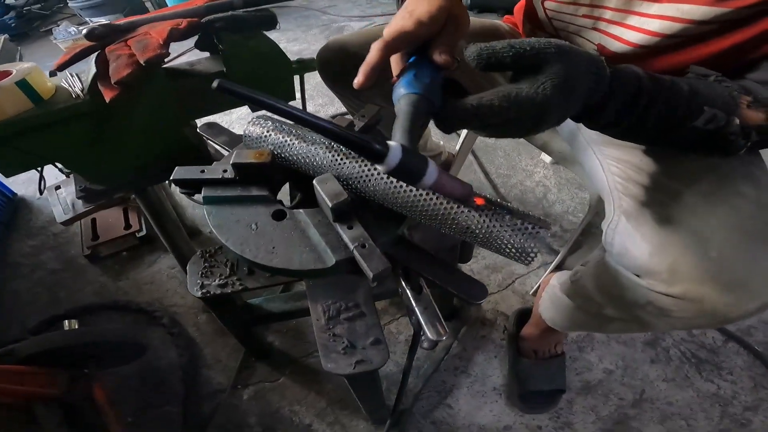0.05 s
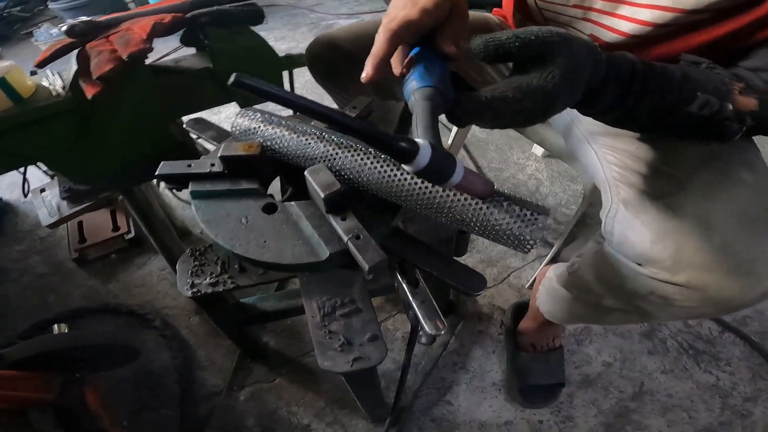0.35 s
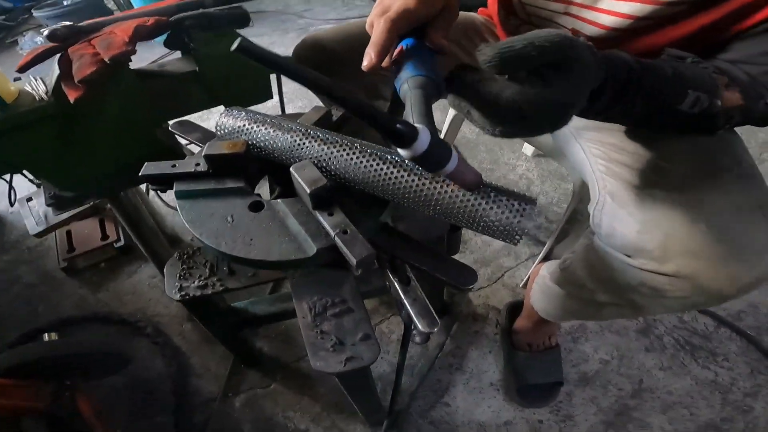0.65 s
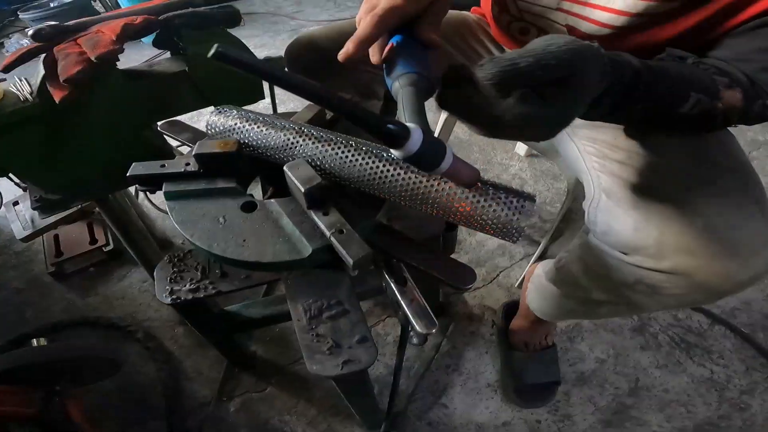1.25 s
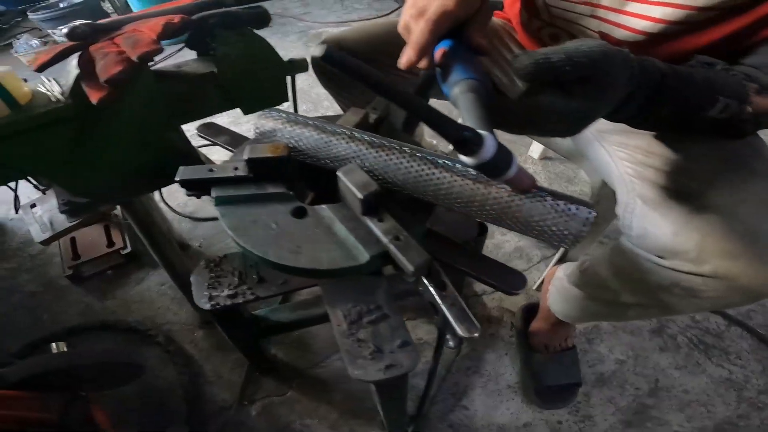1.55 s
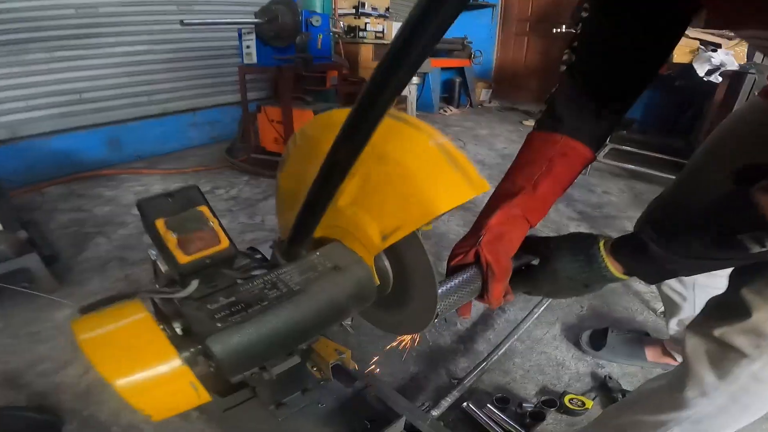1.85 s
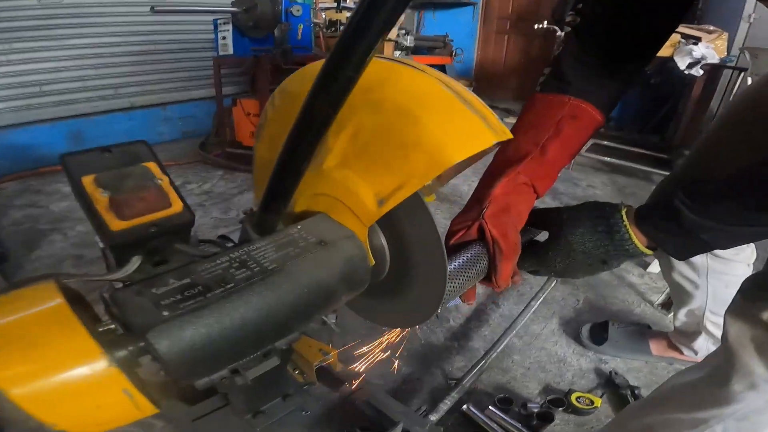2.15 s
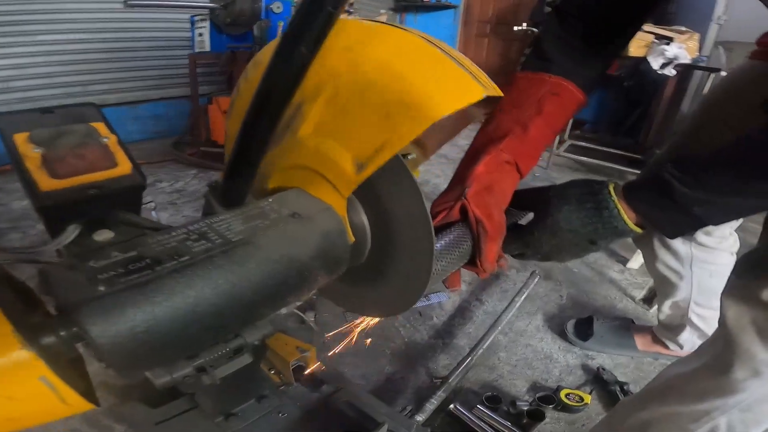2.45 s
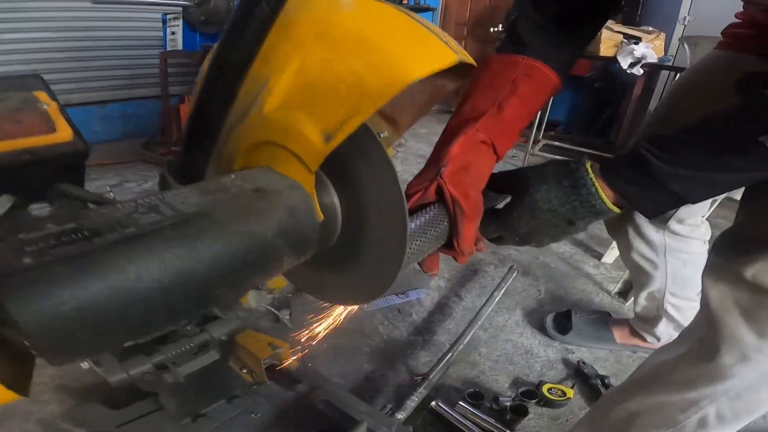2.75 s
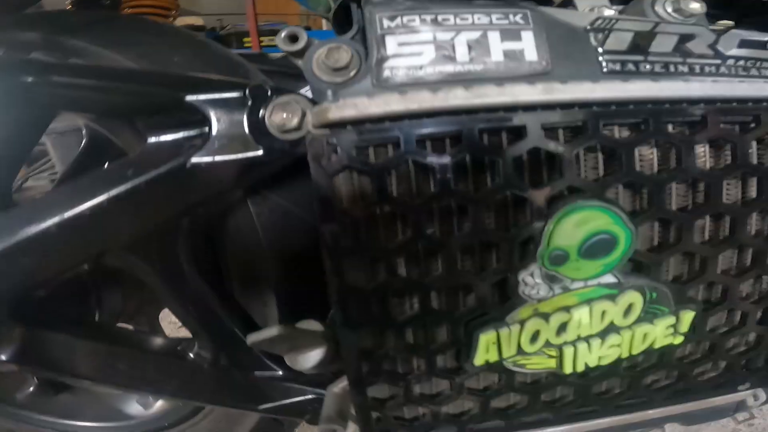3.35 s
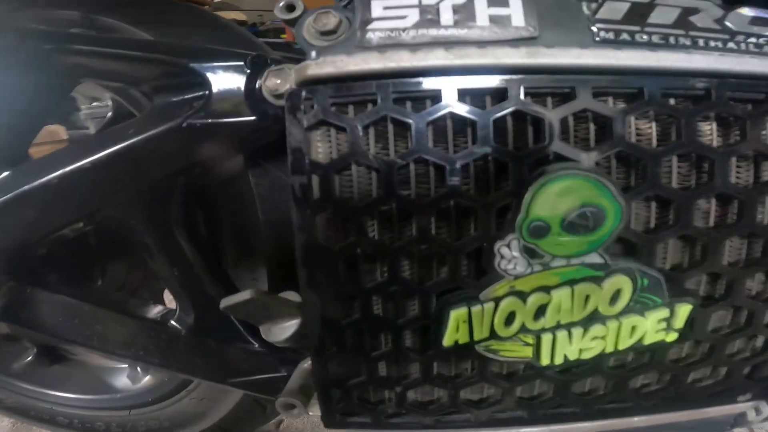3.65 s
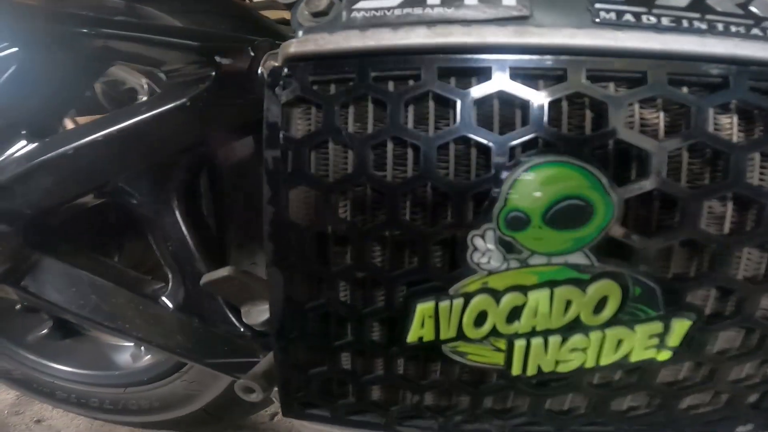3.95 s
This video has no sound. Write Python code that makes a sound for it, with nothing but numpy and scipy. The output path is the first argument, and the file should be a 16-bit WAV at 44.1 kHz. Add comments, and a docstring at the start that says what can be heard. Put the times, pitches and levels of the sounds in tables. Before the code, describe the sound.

A loud chop saw cutting steel tube is the main sound. First a fan roars; a welding arc pops at 1 second, snaps sharply twice, briefly ducking the fan, and hisses at 1.7. At 1.8 the saw starts abruptly, a fast-pulsing, ringing grind whose screech grows shriller, then ragged. It stops at 3.4 with a knock, leaving a quiet machine hum and a light scrape near 3.8.

```python
"""A metal workshop, in three scenes that follow abruptly. Over the roar of a fan a welding arc spits
and snaps, and each snap makes an automatic gain control duck the level. Then an abrasive chop saw
bites into a steel tube once per turn of its wheel: the tube resonates, and stick-slip at the cut
edge screeches ever more shrilly, tearing raggedly at the end. Last, a machine hums in a quieter
room. Short knocks and scrapes sound now and then, and the arc first strikes with a low pop."""
import sys
import numpy as np
from scipy import signal
from scipy.fft import rfft, irfft
from scipy.io import wavfile
from scipy.ndimage import uniform_filter1d, minimum_filter1d, map_coordinates

SR = 44100
rng = np.random.default_rng(int(sys.argv[2]) if len(sys.argv) > 2 else 0)


def digitize_waveform(pressure):
    """Quantize a signal to 16-bit integers and store it at the path in sys.argv[1].

    Rows of a 2-D input are taken as channels; values are limited to [-1, 1].
    """
    field = np.atleast_2d(pressure).T
    bounded = np.clip(field, -1, 1)
    quanta = np.round(bounded * 32767).astype(np.int16)
    wavfile.write(sys.argv[1], SR, quanta)


N = 176400
T = np.arange(N) / SR
HZ = np.fft.rfftfreq(N, 1 / SR)
SAW_START_S, SAW_END_S = 1.819, 3.370
# spectrum of an electric discharge: f/Hz, relative level/dB
ARC_SPECTRUM = [(60, -13), (200, 6.5), (1300, -3), (3000, -1), (5500, -8), (7000, -16), (8500, -37),
                (11000, -35), (15500, -73)]


def amp(db):
    """Amplitude ratio of a level in decibels."""
    return 10 ** (np.asarray(db) / 20)


def unit_rms(x):
    """Normalisation to rms 1."""
    return x / np.sqrt(np.mean(x ** 2) + 1e-20)


def curves(table):
    """Linear interpolation of each column of a time table, at every sample."""
    times, *columns = np.transpose(table)
    return [np.interp(T, times, column) for column in columns]


def at_frequency(table, hz):
    """Interpolation of a table on a logarithmic frequency axis."""
    f, value = np.transpose(table)
    return np.interp(np.log(hz + 1), np.log(f + 1), value)


def filtered(x, response):
    """Linear filtering: the spectrum is multiplied by a frequency response."""
    return irfft(rfft(x) * response, N)


def coloured(x, spectrum):
    """Spectral shaping by a table of levels, at rms 1."""
    return unit_rms(filtered(x, amp(at_frequency(spectrum, HZ))))


def noise(spectrum):
    """Gaussian noise of a given spectrum, at rms 1."""
    return coloured(rng.standard_normal(N), spectrum)


def wander(cutoff_hz):
    """Random fluctuation: low-pass noise of zero mean and rms 1."""
    return unit_rms(filtered(rng.standard_normal(N), np.exp(-(HZ / cutoff_hz) ** 2) * (HZ > 0)))


def resonance(x, hz, width_hz):
    """Forced response of one mode, scaled to conserve the power of white noise."""
    return filtered(x, (1 + 1j * (HZ - hz) / width_hz) ** -2) * np.sqrt(SR / (np.pi * width_hz))


def machine_tones(partials, waver_hz, flutter_db):
    """Sinusoids under random frequency and amplitude modulation."""
    out = np.zeros(N)
    for hz, db in partials:
        peak = np.sqrt(2) * amp(db + flutter_db * wander(14))
        cycles = np.cumsum(hz + waver_hz * wander(10.45)) / SR + rng.random()
        out += peak * np.sin(2 * np.pi * cycles)
    return out


def fan():
    """Broadband and tonal fan noise: a rumble, a rush of air of drifting brightness, and two tones."""
    # spectra of the moving air: f/Hz, relative level/dB
    rumble_spectrum = [(27, -52), (52, -18), (75, -9.5), (170, -5.5), (245, 5), (350, -4.5), (460, 1.5),
                       (650, -9.5), (2000, -66)]
    rush_spectrum = [(150, -34), (500, -1), (950, 6), (2000, 0), (3000, -7), (4200, -11.5), (6000, -24.5),
                     (8500, -46), (11000, -45.5), (15500, -71)]
    # course of the air noise: t/s, rumble level/dB, rush level/dB, brightness of the rush
    airflow = [(0, -19, -15, -4.5), (.25, -19.5, -18, -1), (.6, -20, -21, 6.5), (.87, -18, -21, 1.5),
               (1.05, -20.5, -28.5, 13), (1.4, -20, -29.5, 8.5), (1.65, -19, -28, 4.5), (1.82, -20, -18, 4)]
    # fan tones: f/Hz, level/dB
    partials = [(269, -25), (455, -28)]
    rumble_db, rush_db, brightness = curves(airflow)
    rush = noise(rush_spectrum)
    low = filtered(rush, 1 / (1 + (HZ / 2000) ** 2))
    rush = low * amp(-brightness / 2) + (rush - low) * amp(1.165 * brightness)
    rumble = amp(rumble_db + wander(20)) * noise(rumble_spectrum)
    rush *= amp(rush_db + .5 * wander(30))
    nearness = amp(-5 * abs(T - .57))  # the tones swell, then fade as the listener moves off
    return rumble + rush + nearness * machine_tones(partials, waver_hz=4.22, flutter_db=3)


def knocks_and_pop():
    """Damped noise transients: short knocks and scrapes, and the low pop of the arc striking."""
    # transients: t/s, level/dB, centre f/Hz, half-width/octaves, decay time/s
    transients = [(.944, -15.5, 3260, 0.49, 0.0025), (1.025, -16.5, 545, 0.11, 0.023),
                  (1.935, -19, 1090, 0.33, .04), (2.04, -29, 167.3, 0.064, 0.12),
                  (3.371, -22, 500, 0.12, 0.031), (3.595, -49.5, 5200, 1, 0.086),
                  (3.764, -31, 2640, 0.45, 0.062)]
    out = np.zeros(N)
    for start, db, hz, octaves, decay in transients:
        band = 1 / (1 + (np.log2((HZ + 1) / hz) / octaves) ** 4)
        hiss = unit_rms(filtered(rng.standard_normal(N), band))
        rise = np.clip((T - start) / (.091 * decay), 0, 1)
        out += amp(db) * hiss * rise * np.exp(-abs(T - start) / decay)
    return out


def welding_arc():
    """Gas discharge: the arc strikes at once, hisses with one spectral peak as it fades, and stops."""
    # bursts: t/s, duration/s, level/dB, decay rate/(dB/s), peak f/Hz, treble gain/dB
    bursts = [(1.0228, 0.0067, -9.5, 400, 3870, -11), (1.027, 0.044, -21, 70, 580, -15),
              (1.696, 0.019, -7.5, 117, 4950, -1), (1.718, 0.089, -8, 43, 5040, -5)]
    peak_db, peak_octaves, treble_hz = 7.5, .21, 4440
    treble = 1 / (1 + (treble_hz / (HZ + 1)) ** 20)
    out = np.zeros(N)
    for start, duration, db, fade, hz, treble_db in bursts:
        peak = np.exp(-(np.log2((HZ + 1) / hz) / peak_octaves) ** 2)
        hiss = filtered(rng.standard_normal(N), amp(peak_db * peak + treble_db * treble))
        gate = np.clip((T - start) / .001, 0, 1) * np.clip((start + duration - T) / .004 + 1, 0, 1)
        out += amp(db - fade * abs(T - start)) * gate * coloured(hiss, ARC_SPECTRUM)
    return out


def spark_snaps():
    """Impulsive sources: each spark is a heavily damped pressure oscillation with a brief crack."""
    # sparks: t/s, level before clipping/dB, f/Hz, decay time/s
    sparks = [(1.0780, 18.5, 2900, 0.0002), (1.2318, 15, 2500, 0.00022)]
    crack_share, crack_decay_s = .061, .0026
    out = np.zeros(N)
    for start, db, hz, decay in sparks:
        age = np.maximum(T - start, 0)
        crack = crack_share * noise(ARC_SPECTRUM) * (age > 0) * np.exp(-age / crack_decay_s)
        kick = -np.sin(2 * np.pi * hz * age) * np.exp(-age / decay)
        out += amp(db) * (crack + kick)
    return out


def gain_control(x):
    """Automatic gain control: overload pulls the gain down; it recovers quickly, then slowly."""
    threshold_db, slope, quick_share = -1, 1.35, .77
    attack_s, release_s = .01, (.048, 1.0)
    over_db = np.maximum(20 * np.log10(abs(x) + 1e-9) - threshold_db, 1e-9)
    # peak detectors with exponential release
    quick, slow = (np.exp(np.maximum.accumulate(np.log(over_db) + T / s) - T / s) for s in release_s)
    held_db = quick_share * quick + (1 - quick_share) * slow
    pole = np.exp(-1 / (attack_s * SR))
    reduction_db = slope * signal.lfilter([1 - pole], [1, -pole], held_db)
    out = x * amp(-reduction_db)
    return out / (1 + out ** 6) ** (1 / 6)  # the snaps clip before the gain falls


def wheel_contact(catch_hz):
    """Periodic excitation: the wheel's high side bites once a turn, a little unevenly."""
    # wheel speed: t/s, rotation f/Hz
    speed = [(1.82, 42.45), (2.05, 42.5), (2.2, 42.85), (2.4, 42.5), (2.75, 42.62), (3.05, 42.35),
             (3.2, 42.0), (3.37, 42.35)]
    first_bite_s, rise_turns, hold_turns, fall_db_per_turn = 1.829, .19, .35, 32
    turns = np.cumsum(curves(speed)[0]) / SR
    turns -= np.interp(first_bite_s, T, turns)
    turns += .03 * wander(catch_hz)
    phase = turns % 1
    strength = amp(.8 * rng.standard_normal(256))[np.floor(turns).astype(int)]  # one draw a turn
    rise = np.minimum(phase / rise_turns, 1)
    fall = amp(-fall_db_per_turn * np.maximum(phase - hold_turns, 0))
    return strength * rise * fall


def chop_saw():
    """Forced vibration: the wheel rasps over the tube and its grit digs in, driving the tube's modes."""
    # course of the cut: t/s, then level/dB of rasp, grit, screech and contact between bites
    feed = [(1.82, -23, -31, -42, -6), (1.86, -18.5, -22.5, -24.5, 0), (1.9, -20, -23, -21.5, -24),
            (1.95, -16.5, -24.5, -27, 0), (2.05, -19.5, -20, -18.5, -18), (2.19, -20.5, -20.5, -16.5, -11),
            (2.3, -25.5, -20, -14, -19), (2.5, -25.5, -21.5, -13.5, -15.5), (2.8, -31.5, -23, -11.5, -20),
            (3.1, -30.5, -22.5, -13, -15.5), (3.25, -42, -21.5, -13, -7.5)]
    # modes of the steel tube: f/Hz, width/Hz, level when rasped/dB, level when bitten/dB
    tube_modes = [(391.5, 47, -12, -18.5), (711, 49, -13, -20), (1022, 35, -10.5, -36),
                  (1240, 38, -7.5, -10), (1327, 37, -8.5, -18), (1662, 73, -9, -5), (1773, 31, -8.5, -16.5),
                  (2270, 65, -9, -13.5), (2786, 87, -9, -8), (3170, 70, -12, -9)]
    # spectra of scraping, grinding and the motor's air: f/Hz, relative level/dB
    rasp_spectrum = [(100, -15), (1000, 2.5), (4300, -1.5), (7500, -21.5), (12500, -17.5), (14500, -64)]
    grit_spectrum = [(300, -38), (1600, -4), (3500, 0.5), (4600, 2.5), (6200, -1.5), (6900, -10.5),
                     (8500, -19), (10500, -17.5), (13300, -31), (14500, -58)]
    motor_spectrum = [(30, -44), (80, -14), (125, 8), (300, -3), (400, 3.5), (580, -3.5), (8000, -42)]
    grain_db, catch_db, catch_hz = 2, 2, 80  # the loose tube catches unevenly on the wheel
    rasp_db, grit_db, screech_db, gap_db = curves(feed)
    contact = unit_rms(np.hypot(wheel_contact(catch_hz), amp(gap_db)))
    rasp, grit, strike = rng.standard_normal((3, N)) * amp(grain_db * wander(2200))
    rasp = unit_rms(rasp * contact ** .4 * amp(catch_db * wander(catch_hz)))
    strike = unit_rms(strike * contact)
    ring = sum(resonance(amp(rasp_db + rasped) * rasp + amp(grit_db + bitten) * strike, hz, width)
               for hz, width, rasped, bitten in tube_modes)
    # random signs make the hiss incoherent with the ring
    rasp_hiss = amp(rasp_db - 3) * coloured(rasp * rng.choice([-1, 1], N), rasp_spectrum)
    grit_hiss = amp(grit_db - .5) * coloured(grit * contact ** .58, grit_spectrum)
    screech = amp(screech_db) * edge_screech() * unit_rms(contact ** 1.2)
    cutting = ring + rasp_hiss + grit_hiss + screech
    return cutting + amp(-13) * reverberation(cutting) + amp(-39.5) * noise(motor_spectrum)


def edge_screech():
    """Stick-slip at the cut edge: its modes take turns at a steady total strength, then turn ragged."""
    # modes, swelling and fading as the cut deepens: f/Hz, level/dB, peak t/s, fade rate/(dB/s)
    edge_modes = [(3600, -9, 3.32, 80), (3910, -7, 3.17, 15), (4150, -4.5, 3.2, 10), (4155, 1, 2.06, 63),
                  (4457, -0.5, 2.75, 5.5), (4602, -0.5, 2.1, 2), (4764, -5, 3, 6), (5056, -5, 2.8, 7),
                  (5446, -12, 3.9, 3), (5740, -13.5, 2.9, 6), (6270, -17, 1.85, 24)]
    tear_start_s, tear_jitter_s = 2.8, .00003
    notes = sum(amp(db - fade * abs(T - peak_s)) * resonance(rng.standard_normal(N), hz, width_hz=63)
                for hz, db, peak_s, fade in edge_modes)
    running_power = abs(filtered(notes ** 2, np.exp(-(HZ * .019) ** 2)))
    notes /= np.sqrt(running_power + 1e-6)
    # growing timing jitter breaks up the regular beat
    jitter = np.interp(T, [tear_start_s, SAW_END_S], [0, tear_jitter_s]) * wander(350)
    return map_coordinates(notes, [(T + jitter) * SR], mode="nearest")


def reverberation(x):
    """Reverberation of the workshop: sparse reflections, each band decaying at its own rate."""
    # reverberation time: f/Hz, T60/s
    decay_times = [(150, 0.83), (1000, 0.16), (14000, 0.15)]
    n = SR // 2
    reflections = rng.standard_normal(n) * (rng.random(n) < .1) * (T[:n] > .004)
    hz, t, bands = signal.stft(reflections, SR, nperseg=256)
    decay = amp(-60 * t / at_frequency(decay_times, hz)[:, None])
    tail = signal.istft(bands * decay, SR, nperseg=256)[1]
    return signal.fftconvolve(x, tail / np.linalg.norm(tail))[:N]


def humming_room():
    """A line spectrum on a continuous one: a machine hums under the noise of room air."""
    # machine hum: f/Hz, level/dB
    partials = [(119.8, -41.5), (221.9, -35), (295, -32.5), (369.3, -44.5)]
    # spectrum of the air: f/Hz, relative level/dB
    air_spectrum = [(20, -50), (48, -16.5), (280, -11.5), (780, -16.5), (4650, -31.5), (12000, -70.5)]
    # course of the air noise: t/s, level/dB
    air_level = [(3.37, -27.5), (3.63, -27), (3.81, -28.5), (4, -31.5)]
    air = amp(curves(air_level)[0] + .26 * wander(25)) * noise(air_spectrum)
    return air + machine_tones(partials, waver_hz=.88, flutter_db=0)


def scene():
    """Superposition: welding, sawing and hum follow one another, with short transients on top."""
    fade_s = .0041
    before = lambda s: np.clip((s - T) / fade_s, 0, 1)
    after = lambda s: np.clip((T - s) / fade_s, 0, 1)
    welding = gain_control(fan() + welding_arc() + spark_snaps()) * before(SAW_START_S)
    sawing = chop_saw() * after(SAW_START_S) * before(SAW_END_S)
    hum = humming_room() * after(SAW_END_S)
    return np.array([welding + sawing + hum + knocks_and_pop()] * 2)


def record(dry):
    """Peak limiting, a narrow notch near 9 kHz and a band limit; the top hiss spreads left and right."""
    notch_db, notch_hz, notch_width_hz = -36, 9120, 187
    spread_above_hz, skew_rad, right_top_db, band_limit_hz = 9700, .82, 2, 16200
    gain = np.minimum(1 / (abs(dry[0]) + 1e-9), 1)
    gain = uniform_filter1d(minimum_filter1d(gain, size=130), size=130)
    gain *= np.minimum(np.minimum(T, T[::-1]) / .003, 1)  # fade at both ends
    notch = amp(notch_db * np.exp(-((HZ - notch_hz) / notch_width_hz) ** 2))
    top = np.clip((HZ - spread_above_hz) / 2000, 0, 1)
    skew = skew_rad * top * np.sin(2 * np.pi * HZ / 1300)
    side = np.array([[-1], [1]])  # left, right
    treble_spread = np.exp(1j * side * skew) * amp(side * top * right_top_db / 2)
    stereo = filtered(dry * gain, notch * treble_spread)
    low_pass = signal.firwin(511, band_limit_hz, window=("kaiser", 9), fs=SR)
    return signal.oaconvolve(stereo, low_pass[None], "same")


dry = scene()
out = record(dry)
digitize_waveform(out)
```